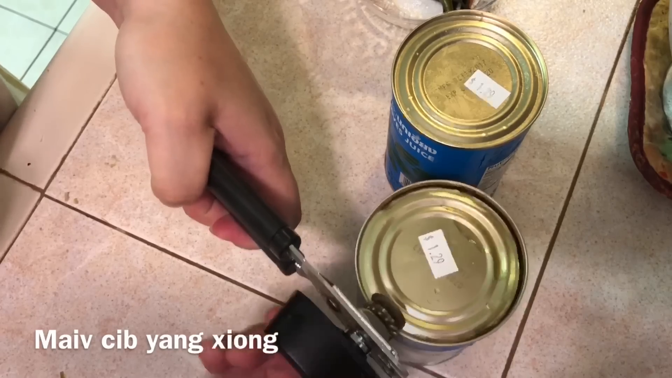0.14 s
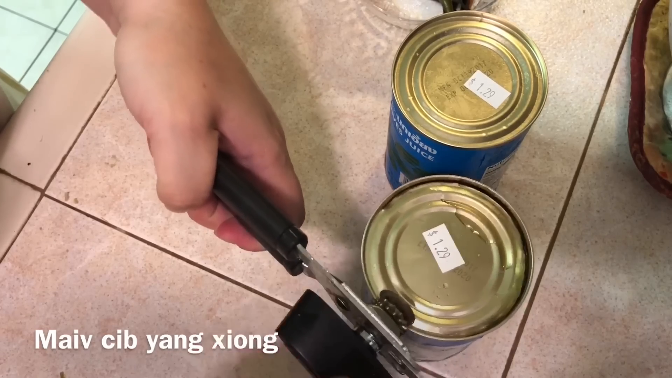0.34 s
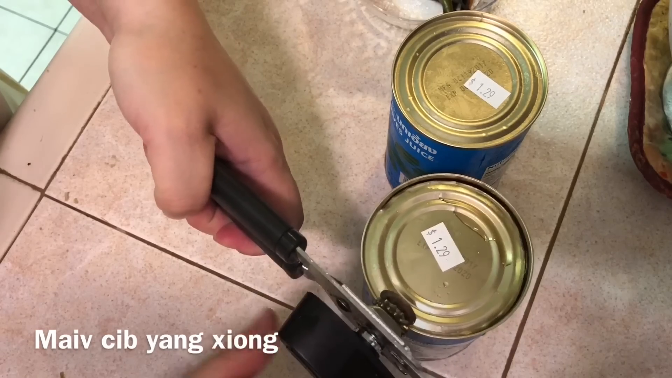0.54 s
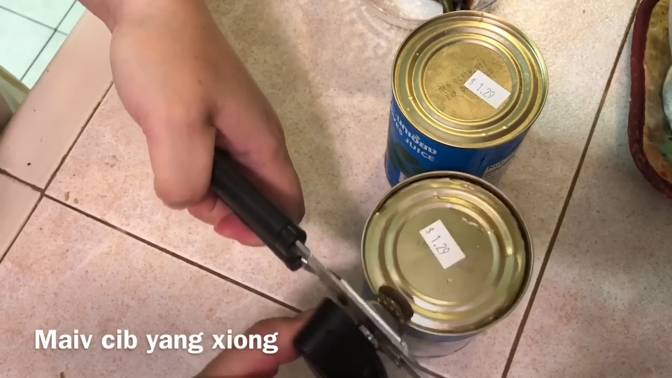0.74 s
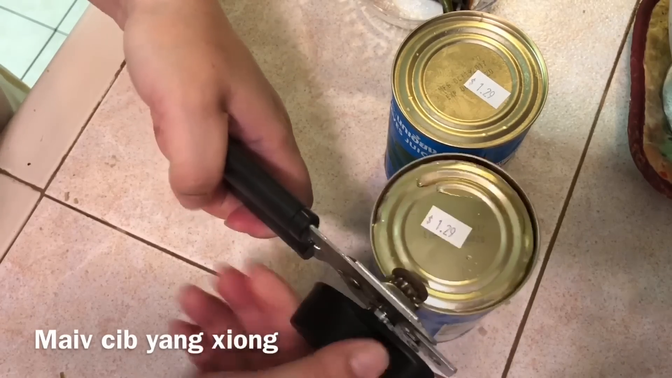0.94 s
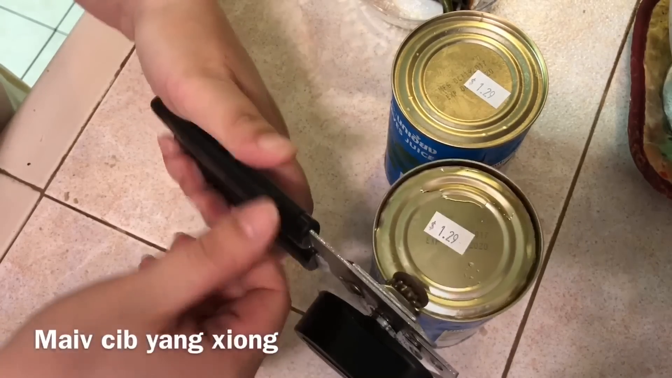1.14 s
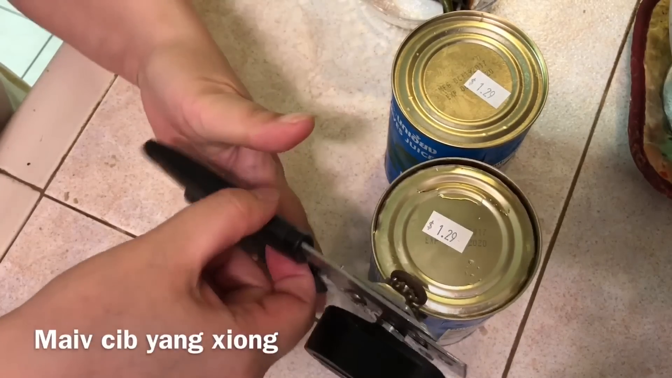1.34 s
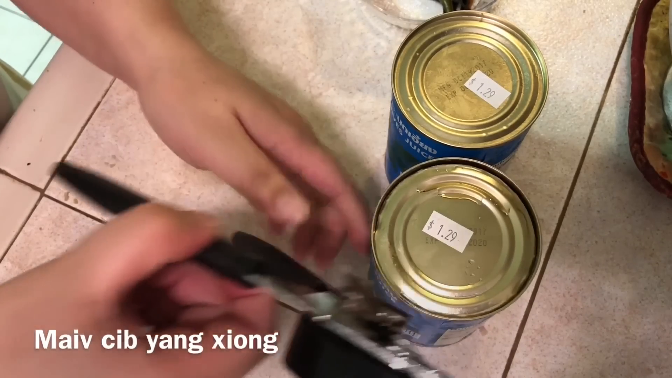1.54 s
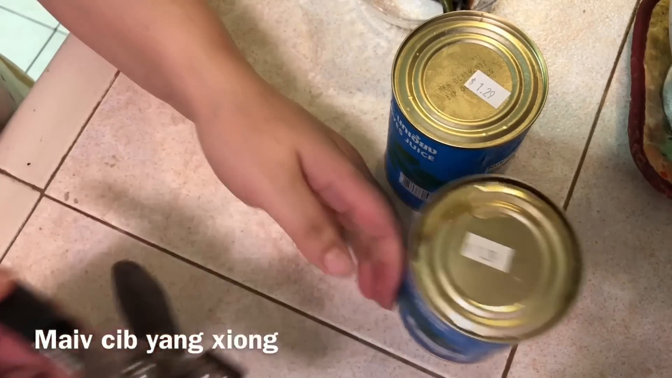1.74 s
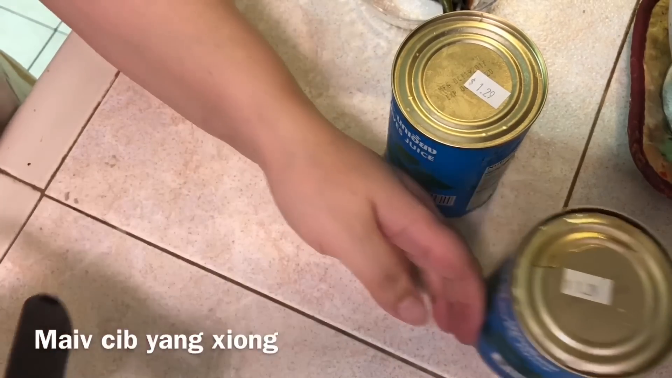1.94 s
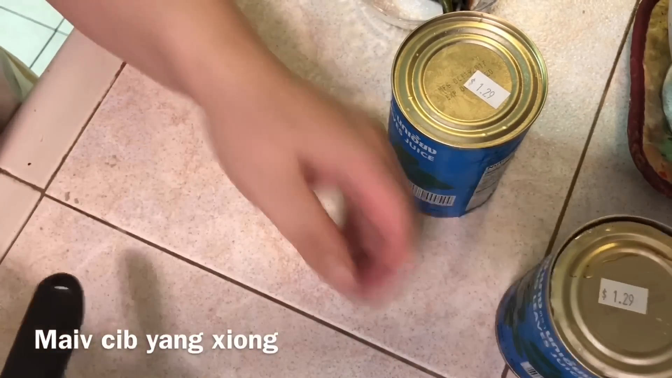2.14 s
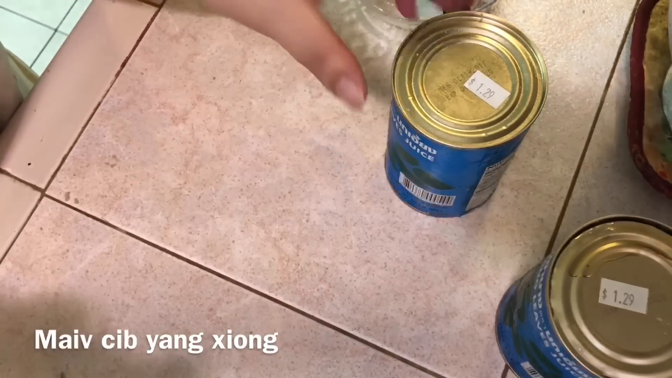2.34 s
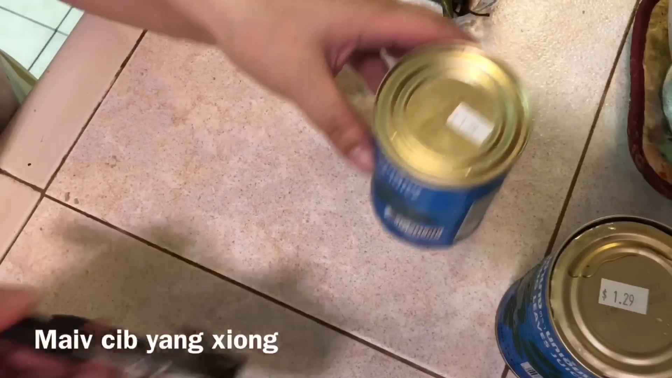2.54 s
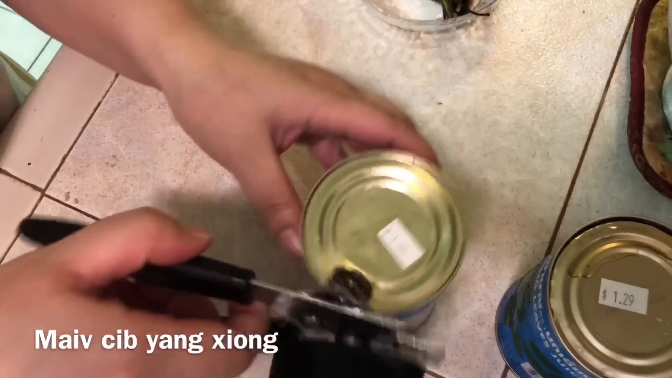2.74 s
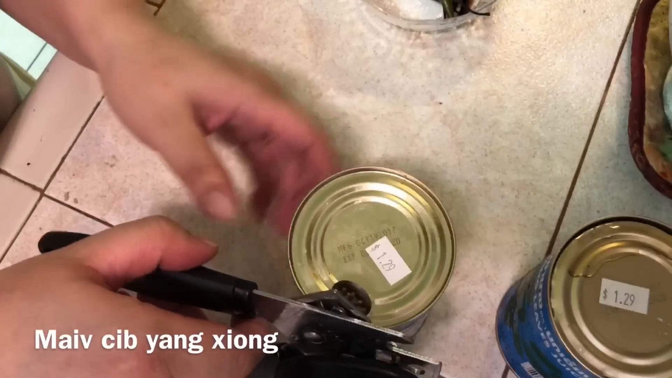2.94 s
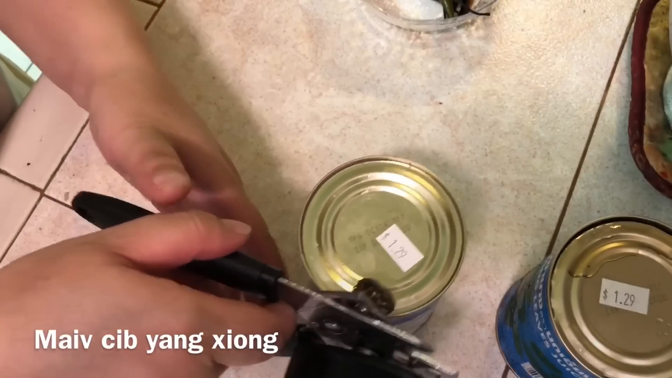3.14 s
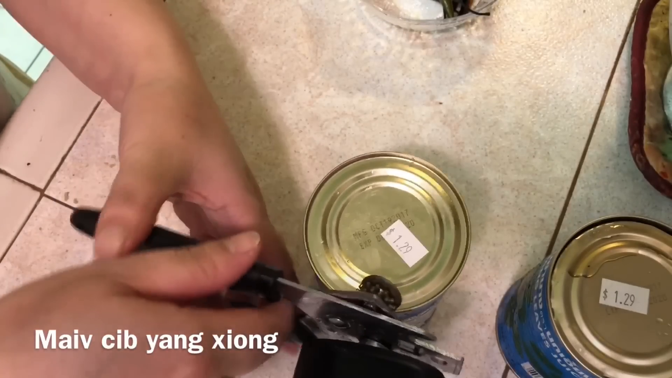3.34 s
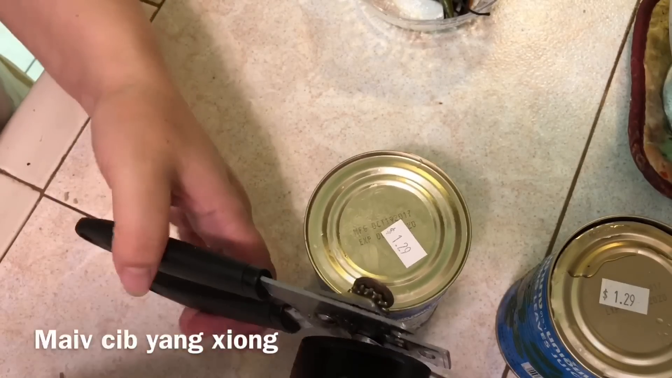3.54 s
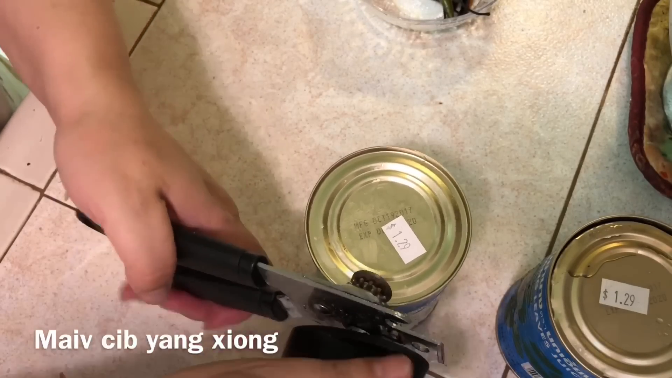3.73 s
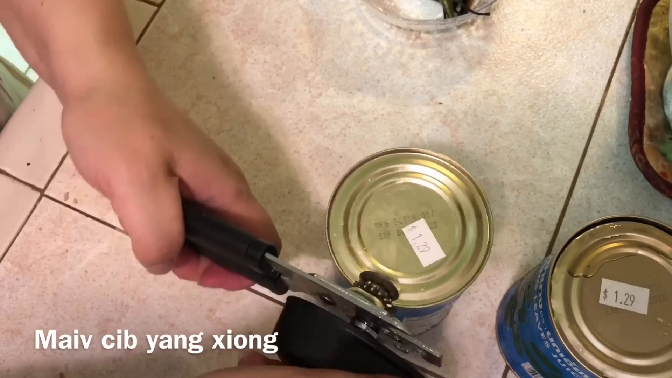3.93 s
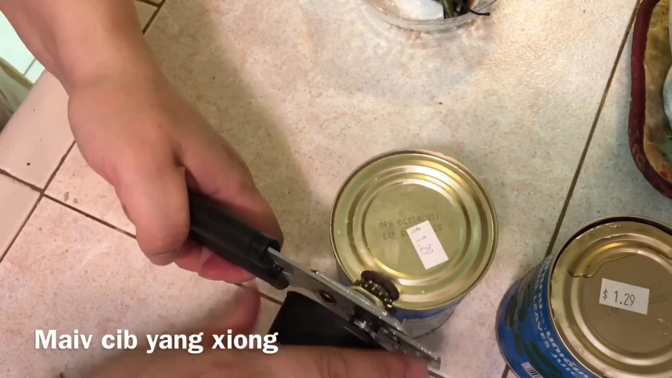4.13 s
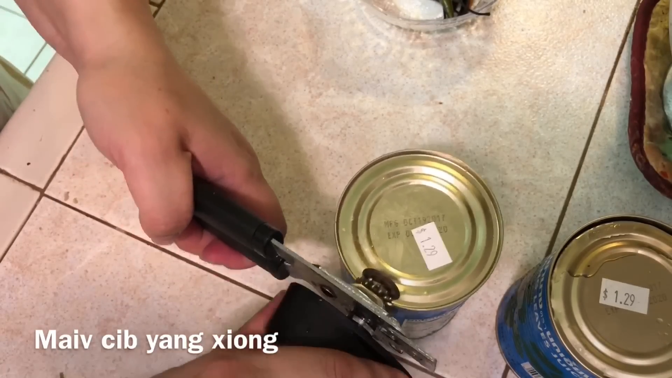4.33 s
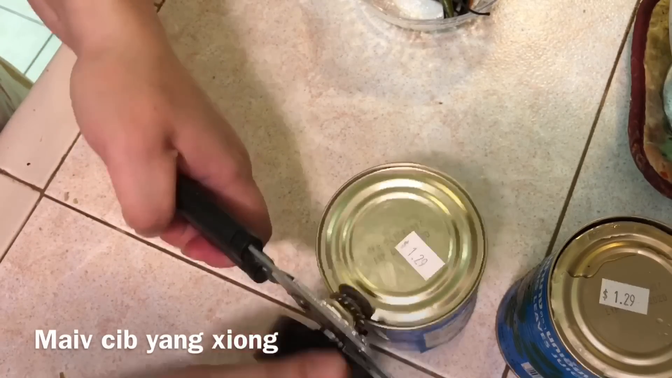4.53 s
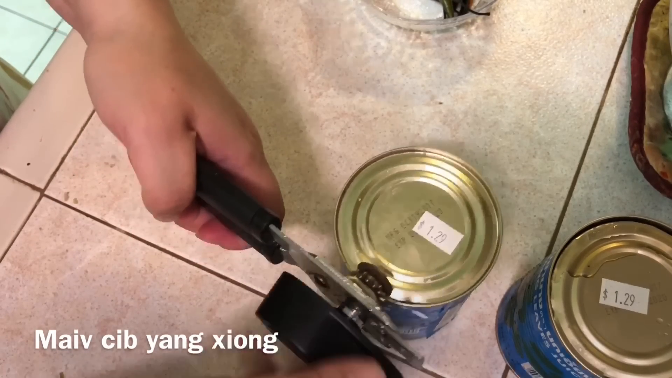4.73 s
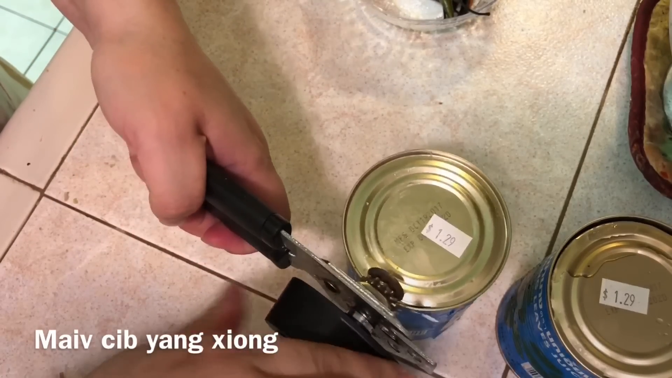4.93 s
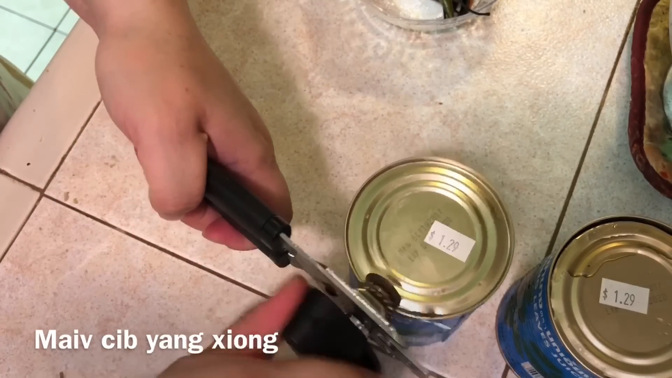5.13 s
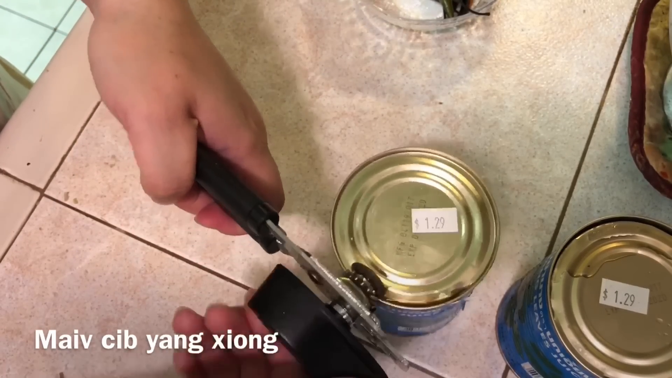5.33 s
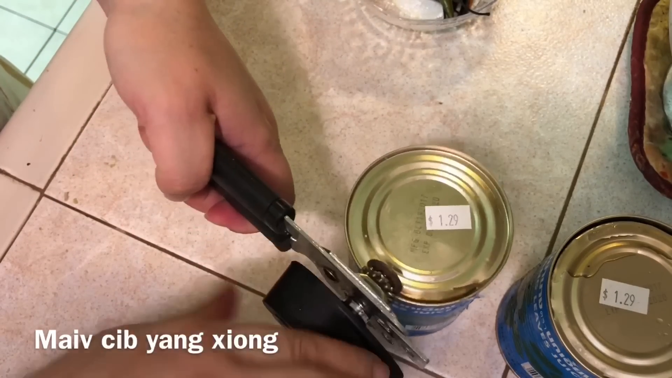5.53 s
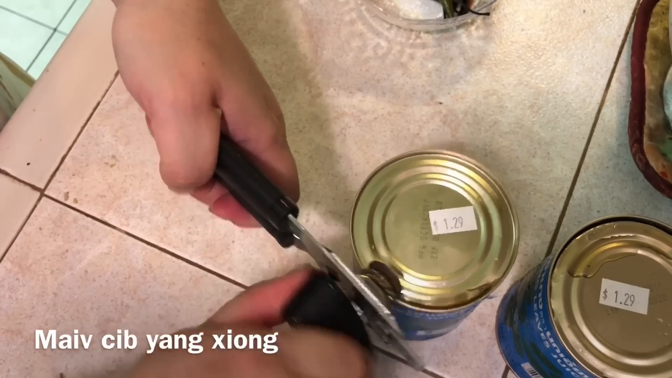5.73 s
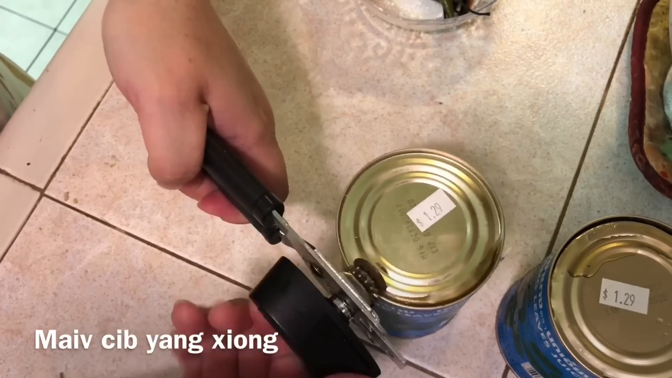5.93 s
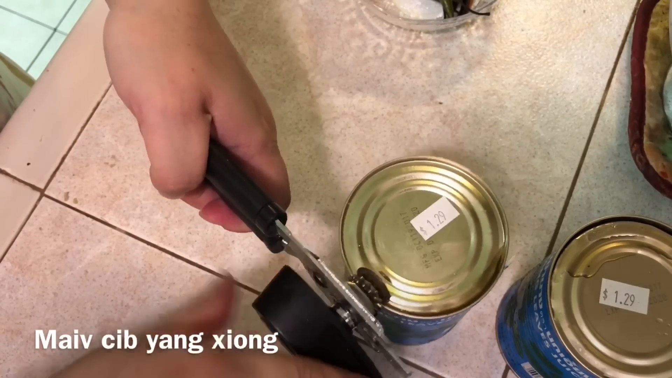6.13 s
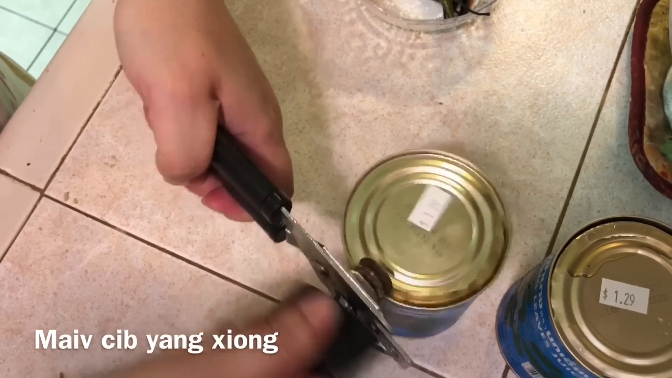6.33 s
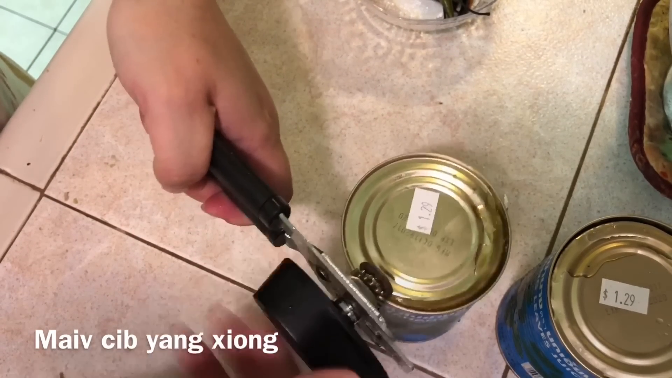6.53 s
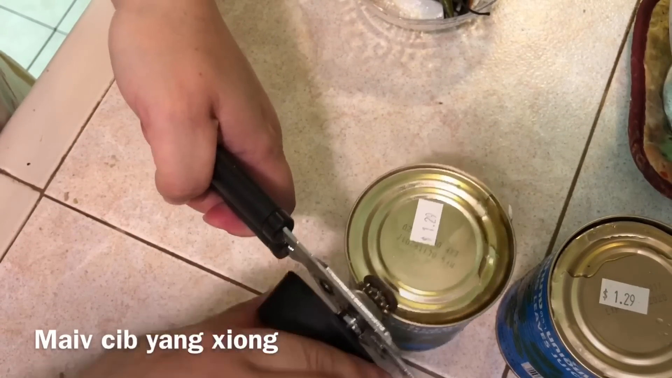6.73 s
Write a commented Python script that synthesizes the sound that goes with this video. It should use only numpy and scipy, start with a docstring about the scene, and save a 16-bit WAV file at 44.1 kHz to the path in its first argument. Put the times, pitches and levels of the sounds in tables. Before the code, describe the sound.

A hand-cranked can opener rasps round a tin lid, cans scrape over tiles, then a sharp puncture and more crunchy cranking.

```python
"""A small tiled room, heard from close by: a hand-cranked opener rasps round a tin lid in short strokes.
Friction slips, tearing ticks, blows and low thuds set resonances ringing; gliding resonances squeal.
The opened can is pushed aside and a full one dragged over the tiles, both scraping.
The opener is clamped on, with faint wobbles and low hums; two snaps puncture the lid, which booms.
It is cranked again with ticks and crunches. Steady hiss and rumble lie under everything."""
import sys
import numpy as np
from scipy import signal
from scipy.fft import rfft, irfft
from scipy.io import wavfile

SR = 44100
rng = np.random.default_rng(int(sys.argv[2]) if len(sys.argv) > 2 else 0)


def to_wav(sig):
    """Store sig (one row per channel, or 1-D mono) as 16-bit WAV at the path in sys.argv[1].

    Samples outside -1..1 are clipped; the rate is SR.
    """
    pcm = np.clip(np.atleast_2d(sig), -1, 1) * 32767
    pcm = np.round(pcm).astype(np.int16)
    wavfile.write(sys.argv[1], SR, pcm.T)  # frames by channels


N = 298557

# turns of the crank: start_s, length_s, bite_db (relative), end_db (relative), treble_db (relative to those)
CRANK_TURNS = [(0.018, 0.2, -39.5, -32, -6), (0.81, 0.12, -43, -37, -4), (1.037, 0.074, -45, -53.5, -11),
               (3.9, 0.037, -44.5, -36, -10.5), (4.227, 0.037, -59, -42, -13),
               (4.585, 0.094, -42.5, -38, -2.5), (5.197, 0.098, -36, -27, -6),
               (5.789, 0.12, -36.5, -26, -4.5), (6.32, 0.13, -40, -26, -5.5),
               (6.746, 0.024, -40.5, -33, -12)]
# in a turn the load builds ever faster and dulls the rasp, then the hand lets go:
# attack_s, build_up_power, treble_lost_db, release_db_per_s, release_dulling_db_per_s
CRANK_SHAPE = (0.0079, 5.5, 0.66, 336, 63.3)
# broad colour of the cut rim: freq_hz, density_db (per Hz, relative)
RASP_COLOUR = [(40, -22), (70, -2), (130, 0), (250, -1.5), (400, -1), (1200, -7), (1700, -9), (2200, -16.5),
               (3200, -15), (4400, -23.5), (5100, -24.5), (8800, -27.5), (11000, -36), (15500, -41)]
# resonances of the rim, then of the steel: freq_hz, width_hz, height_db
RIM_RESONANCES = [(472, 26, 5), (976, 45, 2.1), (1266, 44, 3.2), (3230, 46, 5.3), (4170, 110, 10.2)]
STEEL_RESONANCES = [(2560, 110, 7.7), (3320, 560, 3.6), (4390, 142.8, 11), (6140, 330, 3.7)]


def from_db(db):
    """Decibels to gain."""
    return 10 ** (np.asarray(db) / 20)


def rms_one(x):
    """Scale to unit rms."""
    return x / np.sqrt(np.mean(x ** 2) + 1e-20)


def at_hz(points, hz):
    """Read a table on a log-frequency axis."""
    f, value = np.transpose(points)
    return np.interp(np.log(np.maximum(hz, 1)), np.log(f), value)


def add(out, start, sound):
    """Mix a sound in at a sample."""
    start = max(start, 0)
    out[start:start + len(sound)] += sound[:max(len(out) - start, 0)]


def butter(x, hz, kind, order=2):
    """Causal Butterworth filter."""
    sos = signal.butter(order, np.clip(hz, 10, .45 * SR), kind, fs=SR, output="sos")
    return signal.sosfilt(sos, x)


def wander(count, rate_hz):
    """Slow random drift of spread about 1: low-passed noise."""
    return rms_one(butter(rng.standard_normal(count + SR), rate_hz, "low"))[SR:]


def body(spectrum, modes=(), tilt_db=0, size=4096):
    """Causal impulse response of a broad colour with resonances standing out of it; energy 1."""
    hz = np.arange(size // 2 + 1) * SR / size
    lift = 1 + sum((from_db(db) ** 2 - 1).clip(0) / (1 + (2 * (hz - f) / width) ** 2)
                   for f, width, db in modes)
    octaves = np.log2(np.maximum(hz, 200) / 1000)
    magnitude = from_db(at_hz(spectrum, hz) + tilt_db * octaves) * np.sqrt(lift)
    # folding the cepstrum onto positive times gives minimum phase
    cepstrum = irfft(np.log(magnitude))
    half = size // 2
    folded = 2 * cepstrum[:half] * (np.arange(half) > 0)
    response = irfft(np.exp(rfft(folded, size)))
    return rms_one(response) / np.sqrt(size)


def contact(length_s, rise_s, size=2048):
    """One blow: a brief noisy chatter that builds up and dies; energy 1."""
    t = np.arange(size) / SR
    force = rng.standard_normal(size) * (1 - np.exp(-t / rise_s)) * np.exp(-t / length_s)
    return force / np.linalg.norm(force)


def ring(hz, t60, rise_s):
    """A decaying sine that swells quickly to about height 1."""
    t = np.arange(SR // 2) / SR
    return np.sin(2 * np.pi * hz * t) * (1 - np.exp(-t / rise_s)) * np.exp(-np.log(1000) * t / t60)


def slips(count, per_s, spread_db, smooth):
    """Friction force: tiny slips of uneven size over a smooth rub; rms 1."""
    sizes = from_db(spread_db * np.minimum(rng.exponential(1, count), 3)) * rng.choice([-1, 1], count)
    kicks = rms_one(sizes * (rng.random(count) < per_s / SR))
    return rms_one(kicks + smooth * rng.standard_normal(count))


def judder(count, per_s, depth_db, uneven=0.28):
    """Metal sticks and lets go unevenly: a gain that jumps and sags (swells if depth is negative); rms 1."""
    marks = np.cumsum(rng.uniform(.5, 1.5, 400)) / per_s
    catches = np.interp(np.arange(count) / SR, np.append(0, marks), np.arange(len(marks) + 1))
    strength = rng.normal(0, uneven, len(marks) + 1)[catches.astype(int)]
    return rms_one(from_db(depth_db * (strength - catches % 1)))


def stroke(row, shape):
    """One movement of the hand: attack, a change of load, release. Gives first sample, gain and treble dB."""
    start_s, length_s, first_db, last_db, bright_db = row
    attack_s, power, lost_db, release_db_per_s, dulling_db_per_s = shape
    t = np.arange(int((length_s + .2) * SR)) / SR
    progress = np.minimum(t / length_s, 1) ** power
    after_s = np.maximum(t - length_s, 0)
    level_db = first_db + (last_db - first_db) * progress - release_db_per_s * after_s
    gain = np.minimum(t / attack_s, 1) * from_db(level_db)
    return int(start_s * SR), gain, bright_db - lost_db * progress - dulling_db_per_s * after_s


def rub(rows, shape, colour, modes, slips_per_s, spread_db, smooth, judder_per_s, judder_db,
        treble_db, shift_db, bend, count=4):
    """Juddering friction drives a body; the contact point wanders and favours different modes as it goes."""
    out = np.zeros(N)
    # each mode has nodes and antinodes round the rim, so its strength depends on the spot touched;
    # the contact also bends its pitch, by up to `bend` widths
    angles = rng.uniform(0, 2 * np.pi, len(modes))
    spots = []
    for k in range(count):
        turned = angles + 2 * np.pi * k / count
        touched = [(f + bend * width * np.sin(a), width, db + shift_db * np.cos(a))
                   for (f, width, db), a in zip(modes, turned)]
        spots.append(body(colour, touched))
    # bass and treble are levelled apart, so that a stroke can dull or brighten
    lows = [butter(h, 2250, "low", order=5) / np.linalg.norm(butter(h, [300, 2000], "band"))
            for h in spots]
    highs = [butter(h, 2250, "high", order=5) / np.linalg.norm(butter(h, [2500, 12000], "band"))
             for h in spots]
    for row in rows:
        start, gain, bright_db = stroke(row, shape)
        n = len(gain)
        force = slips(n, slips_per_s, spread_db, smooth) * judder(n, judder_per_s, judder_db) * gain
        nearness = np.exp([2 * wander(n, rate_hz=10.4) for _ in spots])
        for share, low, high in zip(nearness / nearness.sum(0), lows, highs):
            treble_force = force * share * from_db(bright_db + treble_db)
            add(out, start, signal.fftconvolve(force * share, low))
            add(out, start, signal.fftconvolve(treble_force, high))
    return out


def air():
    """Steady background hiss and rumble with faint whistles: noise through a fixed colour."""
    # broad colour: freq_hz, density_db (per Hz, relative)
    air_colour = [(30, -26), (48, -3.5), (133, -1), (315, -4.5), (420, -13), (479, -7), (830, -12),
                  (897, -5.5), (1260, -10), (2830, -18), (5590, -20), (15500, -33)]
    # whistles: freq_hz, width_hz, height_db
    whistles = [(138, 6, 5.5), (3737, 15, 9), (5468.8, 74, 6), (9500, 237, 6.5)]
    noise = signal.fftconvolve(rng.standard_normal(N + SR), body(air_colour, whistles))
    return from_db(-50.5) * rms_one(noise[SR:SR + N])


def cutting():
    """The toothed wheel feeds the rim past the blade: juddering friction through the opener's resonances."""
    # resonances of the opener: freq_hz, width_hz, height_db
    opener_modes = [(215.5, 11, 9.5), (273.5, 11, 13), (480, 30, 9.5), (650, 39, 6), (790, 27, 3),
                    (996.7, 250, 7), (1767, 80, 6.5), (4500, 94, 10.5), (6170, 130, 8), (8470, 250, 7)]
    return rub(CRANK_TURNS, CRANK_SHAPE, RASP_COLOUR, opener_modes,
               slips_per_s=1600, spread_db=2.5, smooth=0.28, judder_per_s=130, judder_db=4.0,
               treble_db=-5.0, shift_db=4.0, bend=0.68)


def tearing(count=6, tilt_db=2.0, colour_db=4):
    """The blade catches and tears on tick by tick through each turn; each tick rings one of several rim spots."""
    ticks_per_s, uneven = 100, 0.6          # mean rate; unevenness of the gaps (share)
    tick_db, tick_spread_db = 22.5, 0.5     # level over the stroke's gain and treble; half-range of sizes
    force = np.zeros((count, N))
    for row in CRANK_TURNS:
        start, gain, bright_db = stroke(row, CRANK_SHAPE)
        gap, size, place = rng.random((64, 3)).T
        times_s = np.cumsum(1 + uneven * (2 * gap - 1)) / ticks_per_s
        levels_db = tick_db + tick_spread_db * (2 * size - 1)
        places = (place * count).astype(int)
        for i, db, spot in zip((times_s * SR).astype(int), levels_db, places):
            tick = contact(length_s=0.00065, rise_s=0.0001)
            if i < len(gain):
                add(force[spot], start + i, from_db(db + bright_db[i]) * gain[i] * tick)
    out = np.zeros(N)
    for spot_force in force:
        modes = [(hz, width, db + rng.normal(0, colour_db))
                 for hz, width, db in RIM_RESONANCES + STEEL_RESONANCES]
        out += signal.fftconvolve(spot_force, body(RASP_COLOUR, modes, tilt_db))[:N]
    return out


def knocks(rows, length_s, rise_s, spot_db=9.5, spot_width_hz=110, rattle_db=-6):
    """Blows clack rim and lid, one pitch standing out where struck; loose parts rattle on briefly."""
    # broad colour of a blow: freq_hz, density_db (per Hz, relative)
    knock_colour = [(50, -34), (110, -6), (220, 2), (350, 0), (500, 1.5), (750, 3), (1000, 3.5), (1350, 3),
                    (2200, -8.5), (3200, -10.5), (5500, -26), (9000, -21), (15000, -37)]
    out = np.zeros(N)
    for s, db, tilt_db, hz in rows:
        rim = body(knock_colour, RIM_RESONANCES + [(hz, spot_width_hz, spot_db)], tilt_db)
        rattle = from_db(rattle_db) * contact(length_s=0.0096, rise_s=0.0066)
        clack = signal.fftconvolve(contact(length_s, rise_s) + rattle, rim)
        # starts just ahead of the listed time, to allow for the build-up
        add(out, int((s - .0015) * SR), from_db(db + 16.0) * clack / np.linalg.norm(clack))
    return out


def clicks(pitch_db=8):
    """Hard contacts: a bright crack that rings briefly at the pitch of the part struck."""
    # sharp clicks of steel on steel or tile: start_s, level_db (relative), pitch_hz
    click_events = [(0.192, -29, 5459), (0.236, -32, 3395), (0.7453, -37, 3100), (0.808, -35.5, 3240),
                    (0.871, -38, 3670), (0.8856, -22, 1480), (0.908, -31, 4200), (0.978, -32, 2626),
                    (1.1927, -35.5, 3300), (1.286, -37.5, 6050), (1.5018, -31.5, 6140), (1.786, -26, 5560),
                    (1.927, -31, 4403), (2.73, -21, 4040), (2.804, -26, 4270), (2.838, -12.5, 4240),
                    (2.8553, -19, 4102), (2.9254, -16.5, 4185), (3.187, -25.5, 3860), (3.474, -38.5, 4470),
                    (3.627, -39, 3531), (4.173, -36, 3444), (4.41, -41, 6800), (4.6377, -24, 3350),
                    (4.689, -32, 3300), (4.8988, -28.5, 3300), (5.289, -35, 3300), (5.903, -24, 3700),
                    (6.416, -30, 7800), (6.433, -27, 4370), (6.4638, -26, 4280)]
    # colour round a click's own pitch: multiple (of the pitch), density_db (per Hz, relative)
    click_colour = [(.06, -8), (.3, 4.5), (1, 9), (1.6, -2.5), (3.5, -10.5)]
    out = np.zeros(N)
    for s, db, hz in click_events:
        colour = [(hz * multiple, level_db) for multiple, level_db in click_colour]
        struck = body(colour, [(hz, hz / 12, pitch_db)] + STEEL_RESONANCES)
        crack = signal.fftconvolve(contact(length_s=0.0026, rise_s=0.00015), struck)
        add(out, int(s * SR), from_db(db + 13.0) * crack / np.linalg.norm(crack))
    return out


def thuds(count=9, spread_db=2, overtone=1.51, overtone_db=-7):
    """The ends of a can boom for a few cycles: pairs of decaying sines, with faint wobbles among them."""
    # low thuds of the cans: start_s, level_db (relative), pitch_hz
    thud_events = [(0.887, -31.5, 276), (0.925, -29, 138), (2.837, -14.5, 279), (2.937, -22, 173),
                   (3.205, -27, 169), (3.465, -37.5, 248), (3.512, -34.5, 172.2), (3.895, -34, 215.6),
                   (3.927, -26.5, 190), (4.053, -33.5, 191.2), (4.215, -29, 194), (4.379, -31.5, 194),
                   (4.467, -31.5, 162), (5.084, -31.5, 221.1), (6.468, -20, 202)]
    # while the opener is clamped on, the can keeps wobbling faintly at uneven intervals
    wobble_span_s, wobble_range_hz, wobble_db = (3.7, 5), (147, 290), -40.5   # level relative, as for thuds
    when, strength, pitch = rng.random((count, 3)).T
    wobble_s = np.interp(np.arange(count) + when, [0, count], wobble_span_s)
    wobble_levels = wobble_db + spread_db * (2 * strength - 1)
    wobble_hz = np.interp(pitch, [0, 1], wobble_range_hz)
    out = np.zeros(N)
    for s, db, hz in [*thud_events, *zip(wobble_s, wobble_levels, wobble_hz)]:
        for multiple, mode_db in ((1, 0), (overtone, overtone_db)):
            boom = ring(hz * multiple, t60=0.061, rise_s=0.004)
            add(out, int(s * SR), from_db(db + mode_db + 4.5) * boom)
    return out


def squeals(width_hz=55, level_db=-4.0, arch=0.43):
    """Slips kick a resonance that glides as the contact travels along the rim: short, rough chirps."""
    # rubbing metal catches and sings: start_s, length_s, first_hz, last_hz, level_db (relative)
    chirp_events = [(0.889, 0.035, 1460, 2020, -36.5), (0.957, 0.038, 1740, 1965, -48),
                    (1.755, 0.071, 1970, 1770, -33.5), (1.792, 0.067, 1485, 1470, -28.5),
                    (1.834, 0.051, 1190, 1070, -29.5), (1.896, 0.073, 1391, 1210, -32.5),
                    (1.763, 0.033, 647, 501.3, -32.5), (1.894, 0.084, 606, 695, -34),
                    (1.962, 0.06134, 870, 1010, -32.5), (1.744, 0.1, 4580, 4200, -48.5),
                    (1.852, 0.042, 4390, 4400, -38), (2.054, 0.095, 4600, 4470, -50.5),
                    (1.888, 0.12, 2930, 3030, -37.5), (1.919, 0.054, 3330, 3220, -45),
                    (2.031, 0.11, 3320, 3280, -48), (2.082, 0.084, 1240, 1240, -36.5),
                    (2.105, 0.047, 783.9, 680, -37.5), (2.628, 0.065, 1344, 1590, -26),
                    (2.675, 0.074, 1050, 1100, -30.5), (2.691, 0.053, 703, 732.2, -27),
                    (2.713, 0.045, 1600, 1661, -27.5), (2.784, 0.033, 1727, 1620, -26),
                    (2.808, 0.076, 980, 950, -28.5), (2.87, 0.041, 1620, 1510, -25),
                    (2.916, 0.031, 955, 880, -31.5), (4.648, 0.049, 2600, 2470, -48)]
    out = np.zeros(N)
    for s, length_s, first_hz, last_hz, db in chirp_events:
        n = int(length_s * SR)
        swell = np.sin(np.pi * np.arange(n) / n) ** arch
        glide = np.exp(2j * np.pi * np.cumsum(np.geomspace(first_hz, last_hz, n)) / SR)
        kicks = slips(n, per_s=500, spread_db=4.5, smooth=0.29)
        # a one-pole resonator in the frame that turns with the glide
        decay = np.exp(-np.pi * width_hz / SR)
        rung = np.imag(glide * signal.lfilter([1], [1, -decay], kicks / glide))
        add(out, int(s * SR), from_db(db + level_db) * rms_one(swell * rung))
    return out


def sliding():
    """The bottom rims grate over the tiles: juddering friction sets the cans ringing."""
    # shoves of the opened can, then pulls on the full one:
    # start_s, length_s, first_db (relative), last_db (relative), treble_db (relative to those)
    pushes = [(1.75, 0.35, -21.5, -40, -9.5), (2.05, 0.072, -23, -30.5, -14.5)]
    drags = [(2.565, 0.17, -24, -25.5, -13), (2.755, 0.16, -20.5, -30, -17), (3.16, 0.097, -32, -45, -15)]
    # a can gets up to speed, slows and stops:
    # attack_s, slowing_power, treble_lost_db, release_db_per_s, release_dulling_db_per_s
    push_shape = (0.09, 0.94, 0.61, 420, 72.7)
    drag_shape = (0.065, 1.032, 1.7, 230, 110)
    # broad colour of each scrape: freq_hz, density_db (per Hz, relative)
    open_colour = [(70, -11), (220, -16), (450, -4.5), (750, -10.5), (1400, -5), (2300, -16), (3000, -25),
                   (4500, -27), (5100, -34.5), (9700, -31), (11000, -43), (15500, -41)]
    full_colour = [(60, -49), (125, -1.5), (300, -3.5), (480, -7.5), (700, -13.5), (1600, -8.5),
                   (2300, -12.5), (3400, -20.5), (4200, -19), (4900, -30.5), (10000, -29), (11500, -37.5),
                   (15500, -35)]
    # resonances of each can: freq_hz, width_hz, height_db
    open_modes = [(499, 27.18, 11.7), (658, 20, 15), (1150, 240, 8.6), (1960, 68, 8.26), (2970, 51, 17.5),
                  (3265, 48.6, 14), (4420, 200, 11.6), (6000, 130, 17), (7660, 110.4, 14),
                  (8530, 234.4, 10), (9700, 223.8, 10)]
    full_modes = [(258, 106, 10.3), (675, 68, 15.4), (1066, 84, 13.8), (1500, 150, 7.7), (1940, 100, 7.1),
                  (3170, 76, 9), (4274, 100, 18), (5940, 170, 20.6), (7527, 171.3, 12), (8670, 260, 11),
                  (9600, 250, 11.3)]
    opened = rub(pushes, push_shape, open_colour, open_modes,
                 slips_per_s=1800, spread_db=3.5, smooth=0.17, judder_per_s=68, judder_db=-1.0,
                 treble_db=3.0, shift_db=3.5, bend=0.25)
    full = rub(drags, drag_shape, full_colour, full_modes,
               slips_per_s=2200, spread_db=4.0, smooth=0.25, judder_per_s=120, judder_db=7.5,
               treble_db=4.5, shift_db=6.5, bend=0.34)
    return from_db(-2.5) * (opened + full)


def hum(waver=0.38):
    """A soft, wavering low sine that comes and goes, sinking in pitch as it fades."""
    # start_s, length_s, first_pitch_hz, level_db (before the fade)
    hum_events = [(4.29, 0.24, 149.7, -40), (5.3, 0.27, 147.6, -38), (5.603, 0.066, 120.8, -43),
                  (6.305, 0.092, 119, -39)]
    attack_s, fade_db_per_s, sag_hz_per_s = 0.0079, 43, 25
    out = np.zeros(N)
    for s, length_s, hz, db in hum_events:
        t = np.arange(int(length_s * SR)) / SR
        ramps = np.minimum(np.minimum(t, length_s - t) / attack_s, 1)
        gain = ramps * from_db(db - fade_db_per_s * t)
        swell = 1 + waver * wander(len(t), rate_hz=35.0)
        tone = np.sin(2 * np.pi * np.cumsum(hz - sag_hz_per_s * t) / SR)
        add(out, int(s * SR), gain * swell * tone)
    return out


def puncture():
    """Two noisy snaps in quick succession; decaying sines boom from the second. Gives snaps and boom."""
    # the blade breaks through, then the jaws slam shut: start_s, level_db (relative), low_edge_hz, high_edge_hz
    snap_events = [(4.551, 6.999, 500, 9200), (4.561, 6, 3500, 16980)]
    # broad colour of a snap: freq_hz, density_db (per Hz, relative)
    snap_colour = [(200, -23), (800, -7), (1500, -8), (2100, -1), (2800, 3), (4200, 0.5), (5200, 1.5),
                   (9000, -1), (11800, -5), (15500, 4)]
    # the punctured lid rings: freq_hz, level_db (relative), t60_s
    lid_modes = [(214, -10, 0.074), (351, -24.5, 0.073), (483, -37, 0.094), (958, -26.5, 0.071),
                 (1035, -29, 0.124)]
    snaps = np.zeros(N)
    for s, db, low_hz, high_hz in snap_events:
        crack = signal.fftconvolve(contact(length_s=0.0019, rise_s=0.00092),
                                   body(snap_colour, STEEL_RESONANCES))
        crack = butter(crack, low_hz, "high", order=1)
        add(snaps, int(s * SR), from_db(db) * butter(crack, high_hz, "low", order=8))
    boom = np.zeros(N)
    lid = sum(from_db(db) * ring(hz, t60, rise_s=0.0032) for hz, db, t60 in lid_modes)
    add(boom, int(snap_events[-1][0] * SR), lid)
    return snaps, boom


def room(x, early_db, tail_db, early_s=0.0034):
    """Quick reflections off the tiles, then a diffuse noise tail with its own decay in each band."""
    # room decay: freq_hz, t60_s
    decay_times = [(120, 0.47), (400, 0.38), (1000, 0.46), (3000, 0.32), (7000, 0.15), (14000, 0.3)]
    t = np.arange(SR // 2) / SR
    edges = np.geomspace(60, 17000, 9)
    tail = np.zeros(len(t))
    for low, high in zip(edges, edges[1:]):
        band = butter(rng.standard_normal(len(t)), [low, high], "band")
        tail += band * np.exp(-np.log(1000) * t / at_hz(decay_times, np.sqrt(low * high)))
    tail *= t > .007
    early = butter(rng.standard_normal(len(t)) * np.exp(-t / early_s) * (t > .002), 692.7, "high")
    echoes = from_db(early_db) * early / np.linalg.norm(early)
    echoes += from_db(tail_db) * tail / np.linalg.norm(tail)
    return x + signal.fftconvolve(x, echoes)[:N]


def scene():
    """All the handling sounds in the room, over its background."""
    # can and opener knock against each other or the tiles:
    # start_s, level_db (relative), tilt_db_per_octave (treble), pitch_hz (of the spot struck)
    knock_events = [(0.024, -29.5, -2, 876), (0.208, -39, -5.5, 490), (0.745, -25, 0, 517.7),
                    (0.886, -18.5, -7.5, 680), (1.448, -23, -2, 920), (1.498, -32, 1.5, 1000),
                    (1.765, -28, -1, 635.7), (2.568, -26.5, -1, 1750), (2.741, -19, -3, 1090),
                    (2.852, -10, 2, 1000), (3.205, -25.5, -4.5, 1060), (3.693, -28.5, -1.5, 1180),
                    (4.211, -25, -7, 990), (4.551, -14.5, 0.5, 1720), (4.643, -24.5, -1.5, 1010),
                    (4.747, -30, -4.5, 754), (4.822, -28.5, -1, 1044), (4.8985, -16, -2.5, 1030),
                    (5.083, -22.5, -1, 990), (5.581, -26, -2.5, 900), (5.713, -20, -3, 1430),
                    (5.81, -21.5, -1, 1140), (6.311, -18.5, -2.5, 1190)]
    # the lid buckles and gives under the blade in a drawn-out crunch:
    # start_s, level_db (relative), tilt_db_per_octave (treble), pitch_hz
    crunch_events = [(0.237, -20, -2, 478), (4.575, -20.5, -4.5, 820), (5.215, -18, -1, 1610),
                     (5.312, -17.5, 0, 1160), (5.866, -19, 1, 780), (5.909, -15.5, -1, 630),
                     (6.281, -21.5, -5.5, 920), (6.418, -18, -2.5, 960), (6.464, -14, -2, 1240)]
    snaps, boom = puncture()
    blows = knocks(knock_events, length_s=0.0044, rise_s=0.0023)
    crunches = knocks(crunch_events, length_s=0.013, rise_s=0.0076)
    handling = from_db(-2.0) * cutting() + tearing() + sliding() + blows + crunches + clicks() + snaps
    # each group reaches the microphone with its own share of reflections
    chirps = room(squeals(), early_db=-9, tail_db=-10.0)
    booms = room(thuds() + boom, early_db=9.5, tail_db=-7.5)
    return (room(handling, early_db=-6.5, tail_db=-7.5) + chirps + booms + hum() + air())[None]


def record(dry):
    """The microphone drops the deepest bass; a steep low-pass cuts the top."""
    bass_cut = butter(dry, 45, "high", order=4)
    # 70 dB down from 16450 Hz upward
    top_cut = signal.cheby2(16, 70, 16450, fs=SR, output="sos")
    return signal.sosfilt(top_cut, bass_cut)


dry = scene()
out = record(dry)
to_wav(out)
```